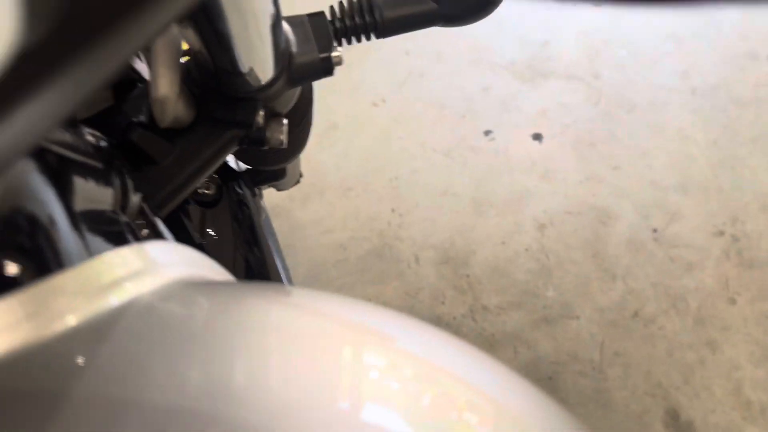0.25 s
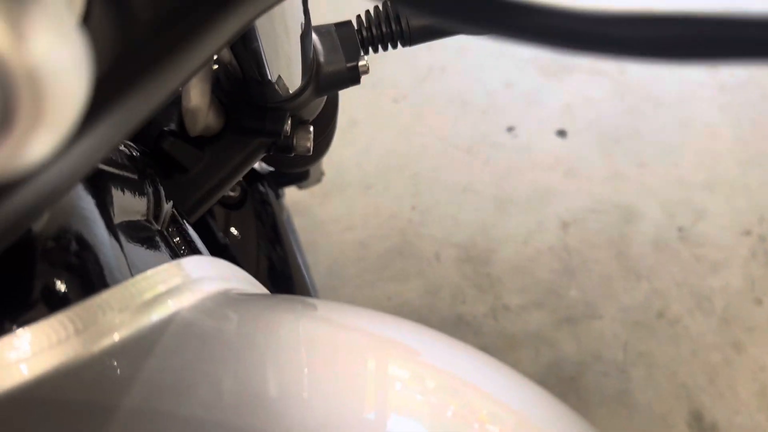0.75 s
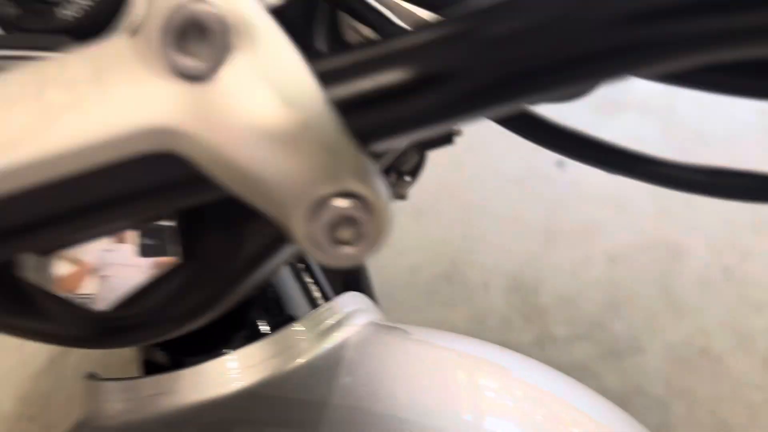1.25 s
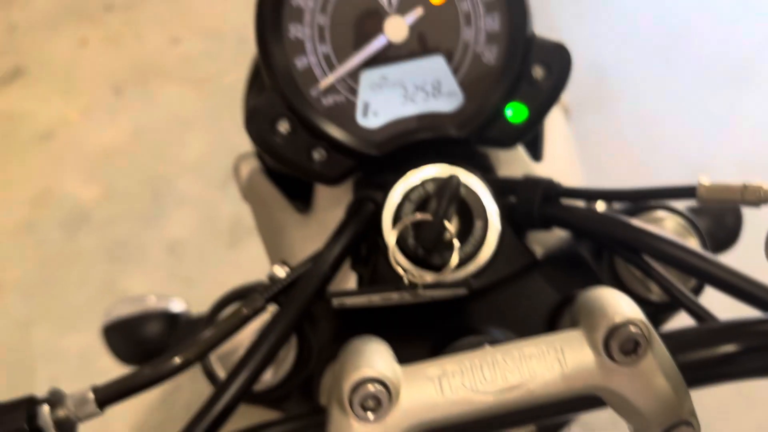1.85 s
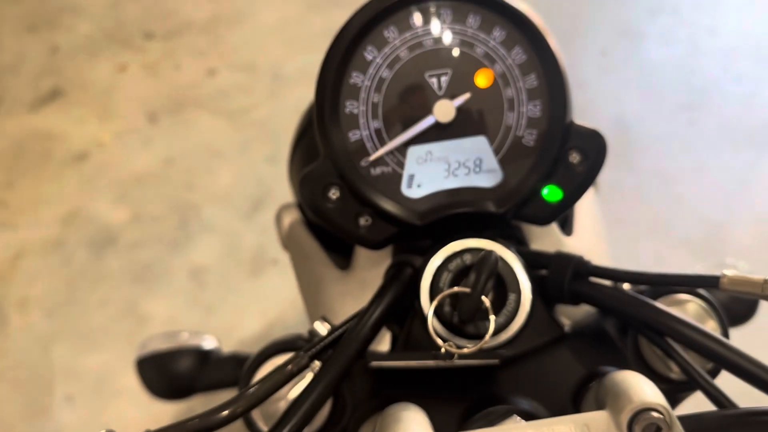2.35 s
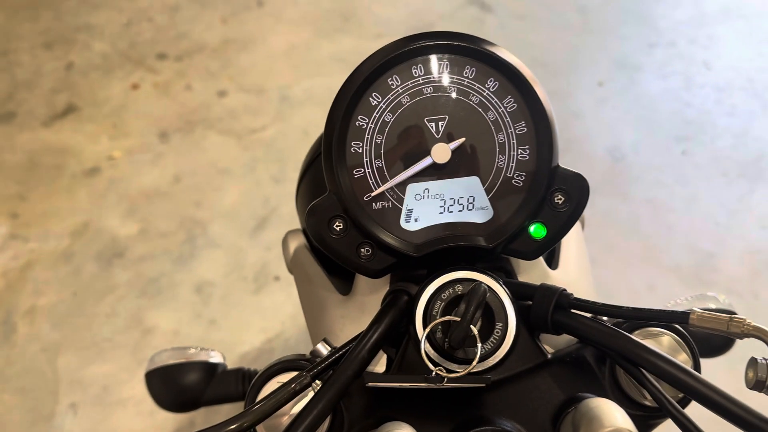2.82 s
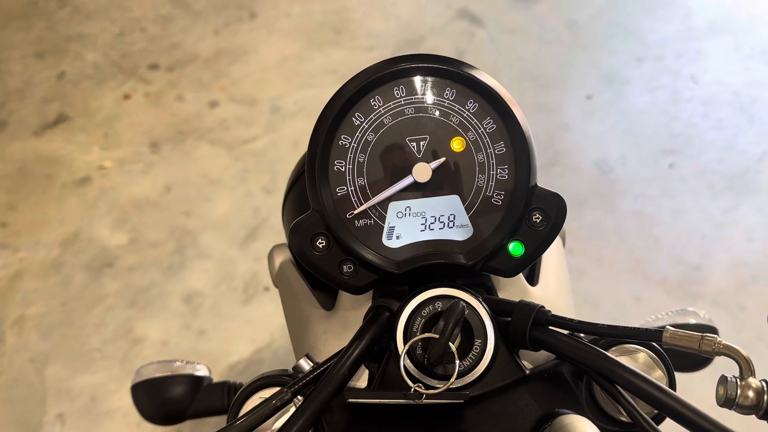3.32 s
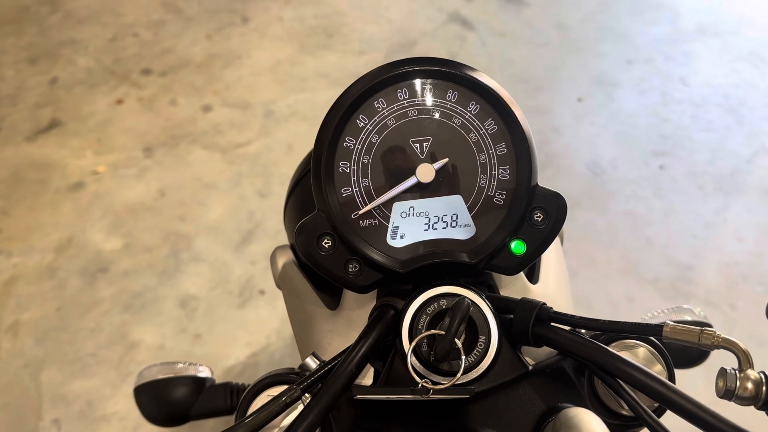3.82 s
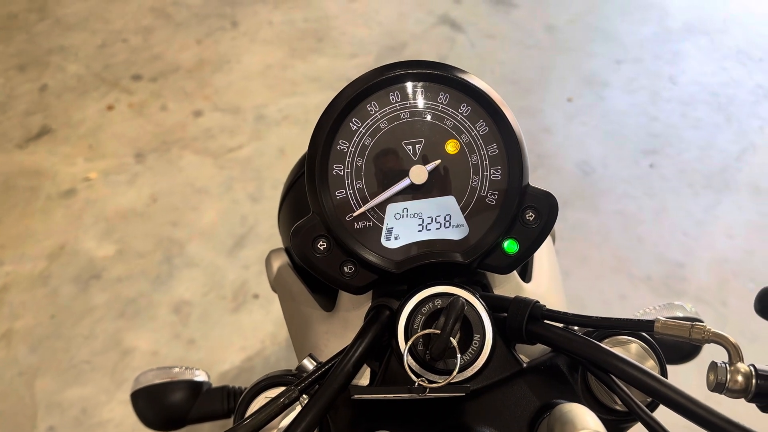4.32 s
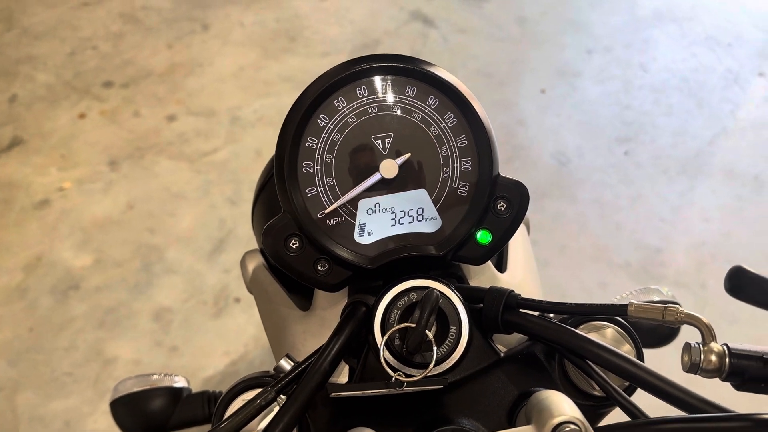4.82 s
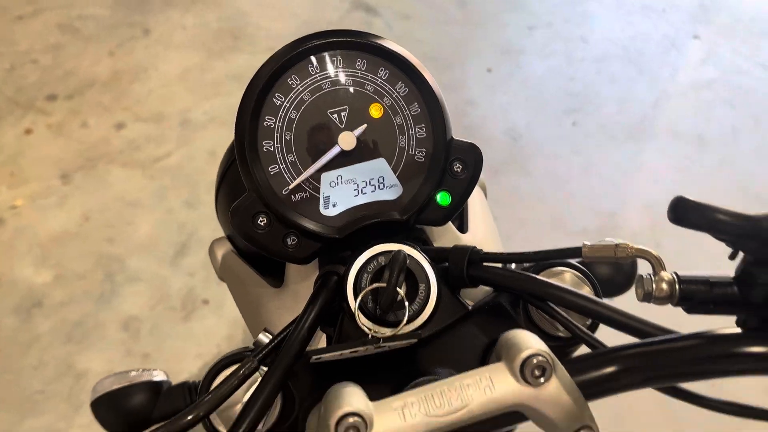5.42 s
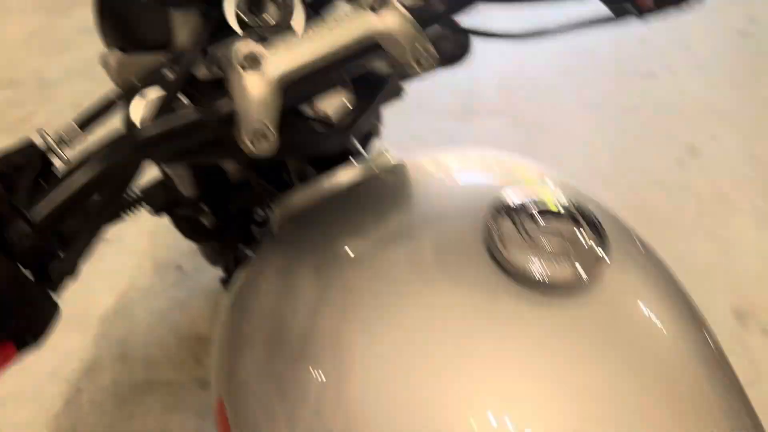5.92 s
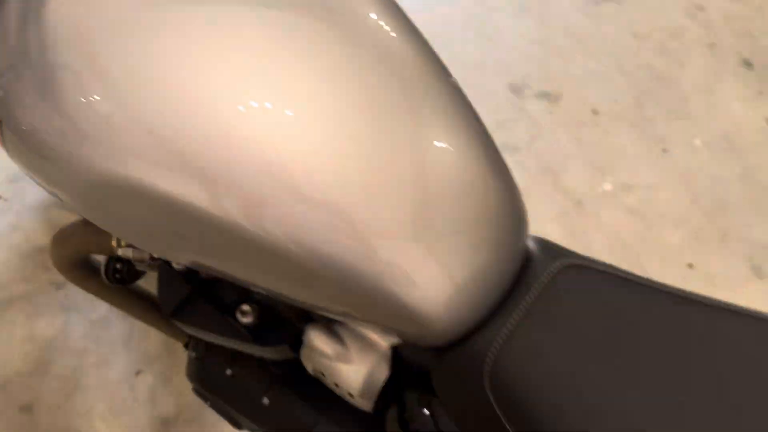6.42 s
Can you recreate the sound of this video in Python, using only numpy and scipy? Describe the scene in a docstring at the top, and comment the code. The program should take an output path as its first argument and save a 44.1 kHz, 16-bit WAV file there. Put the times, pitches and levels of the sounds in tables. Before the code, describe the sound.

An electric starter cranks a two-cylinder motorcycle engine with a few quick, grinding, squealing strokes. In under a second the engine catches with a burst of uneven firings, then settles into a deep, throbbing idle that continues to the end. A gear whine and light valve and chain clatter ride over the exhaust. The microphone is close, above the fuel tank, in a hard-floored room with a short echo.

```python
"""Hard-floored hall: a starter motor cranks a two-cylinder motorcycle engine; it catches and idles.
The starter gears sing, grind and squeal against each compression stroke.
Two unevenly spaced firings per cycle ring the exhaust and the hall; gears whine with engine speed
over valve and chain clatter. A hand-held pair of microphones is above the tank."""
import sys
import numpy as np
from scipy import signal
from scipy.fft import rfft, irfft
from scipy.io import wavfile
from scipy.ndimage import uniform_filter1d

SR = 44100
rng = np.random.default_rng(int(sys.argv[2]) if len(sys.argv) > 2 else 0)


def store_wav(level_fs):
    """Save 16-bit WAV to argv[1]."""
    pcm = np.round(np.clip(np.atleast_2d(level_fs), -1, 1) * 32767)
    wavfile.write(sys.argv[1], SR, pcm.T.astype(np.int16))


N = 293706
TIME_S, BIN_HZ = np.arange(N) / SR, np.fft.rfftfreq(N, 1 / SR)
SETTLED_S = .9  # steady firing begins


def gain(db):
    return 10 ** (np.asarray(db) / 20)


def unit_rms(x):
    return x / np.sqrt(np.mean(x ** 2) + 1e-20)


def per_bin(curve):
    """(Hz, value) curve at each FFT bin, interpolated in log frequency."""
    hz, value = np.transpose(curve)
    return np.interp(np.log(BIN_HZ + 1), np.log(hz + 1), value)


def per_sample(curve):
    """Value columns of a (s, values...) curve at each sample."""
    times_s, *columns = np.transpose(curve)
    return [np.interp(TIME_S, times_s, column) for column in columns]


def noise_pair():
    return rng.standard_normal((2, N))


def shaped_noise(spectrum):
    """Two independent noises with the given spectral shape, unit RMS."""
    return unit_rms(irfft(rfft(noise_pair()) * gain(per_bin(spectrum)), N))


def resonate(x, hz, width_hz):
    """One resonance, fixed or gliding: a click rings as a dying sine."""
    carrier = np.exp(2j * np.pi * np.cumsum(hz * np.ones(N)) / SR)
    pole = np.exp(-np.pi * width_hz / SR)
    return (carrier * signal.lfilter([1], [1, -pole], x * carrier.conj())).imag


def ring(x, modes):
    """Bank of resonances driven by x, unit RMS."""
    return unit_rms(sum(np.sign(polarity) * gain(db) * resonate(x, hz, width_hz)
                        for hz, width_hz, db, polarity in modes))


def engine_speed():
    """Four-stroke cycle rate and running cycle count; the idle hunts slowly."""
    # idle speed: (time [s], cycle rate [Hz])
    idle_speed = [(.9, 12.643), (1.4, 11.957), (2.1, 12.926), (2.4, 12.868), (2.65, 12.498), (2.95, 12.724),
                  (3.25, 12.606), (3.7, 13.039), (4.05, 12.78), (4.45, 12.807), (5.05, 13.242),
                  (5.55, 12.693), (5.85, 12.537), (6.25, 12.215), (6.7, 12.369)]
    cycle_hz = per_sample(idle_speed)[0]
    cycles = np.cumsum(cycle_hz) / SR
    return cycle_hz, cycles - cycles[round(SETTLED_S * SR)] + .425  # phase at SETTLED_S


def hall(x, t60_s=.5, gap_s=.008):
    """Reverberation: one decaying noise tail per channel."""
    t = np.arange(SR // 2) / SR
    tails = rng.standard_normal((2, len(t))) * gain(-60 * t / t60_s) * (t > gap_s)
    return signal.fftconvolve(x, tails / np.linalg.norm(tails[0]), axes=1)[:, :N]


def running_gear(whine_db=-29, clatter_db=-34.5, sag_db_per_s=.38, ease_s=.6, ticks_per_s=300):
    """Throbbing gear whines, ringing covers, valve and chain clatter; louder just after the catch."""
    # gear whines: (cycle rate multiple, width [Hz], relative level [dB], throbs per cycle, depth [0-1])
    gear_orders = [(99.26, 37.3, -1, 4, 0.38), (103.93, 30, -8.5, 4, 0.55), (91.5, 65, -14.5, 4, 0.54),
                   (305.8, 157, -10.5, 3, 0.05), (289.3, 210, -18, 3, 0.04), (395, 260, -23.5, 2, 0.16),
                   (506.4, 200, -23, 2, 0)]
    # cover resonances: (frequency [Hz], width [Hz], relative level [dB], start [s], end [s])
    cover_modes = [(1254, 10, -8, .8, 7), (1350, 10, -10, 4.6, 5.3), (4027, 4, -18, 3.3, 5.45),
                   (5920, 20, -27, 1, 7), (785, 25, -17, 1.8, 5.4), (1090, 40, -15, 1.8, 5.6),
                   (2650, 120, -17, 1, 7), (1980, 30, -14, .75, 1.5)]
    # valve and chain noise: (frequency [Hz], relative density [dB])
    clatter_spectrum = [(140, -19), (240, -7.5), (330, -16), (520, -18), (900, -16), (1200, -11.5),
                        (1560, -14.5), (2100, -19), (2700, -23), (3190, -25), (4430, -29), (6400, -33.5),
                        (7500, -24.5), (8420, -37), (9000, -31), (10200, -33.5), (12500, -48),
                        (15400, -47.5)]
    t = TIME_S
    cycle_hz, cycles = engine_speed()
    whine = 0
    for order, width_hz, db, throbs, depth in gear_orders:
        hz = order * cycle_hz
        band = resonate(resonate(noise_pair(), hz, width_hz), hz, width_hz)
        throb = 1 + depth * np.cos(2 * np.pi * round(throbs) * (cycles - .1))
        whine += gain(db) * unit_rms(band) * throb
    for hz, width_hz, db, start_s, end_s in cover_modes:
        fade = np.clip(np.minimum(t - start_s, end_s - t) / .19, 0, 1)
        whine += gain(db) * fade * unit_rms(resonate(noise_pair(), hz, width_hz))
    ticks = gain(.83 * rng.exponential(1, N)) * (rng.random(N) < ticks_per_s / SR)
    ticks = uniform_filter1d(ticks, size=300)
    clatter = shaped_noise(clatter_spectrum) * (1 + .1 * ticks / ticks.std())
    started = np.clip((t - .68) / .045, 0, 1)
    cold = np.exp(-np.maximum(t - SETTLED_S, 0) / ease_s)
    whine *= gain(whine_db - sag_db_per_s * t + 4.5 * cold) * np.interp(t, (.8, .95), (.3, 1))
    return started * (whine + gain(clatter_db + 8.5 * cold) * clatter)


def squeal(start_s, first_hz, last_hz, db, rise_s=.006, glide_s=.02, t60_s=.29):
    """A starter gear bite squeals or rings the casing: an unsteady tone swells, slides to its last pitch and
    dies."""
    t = np.maximum(np.arange(SR + SR // 4) / SR - start_s, 0)
    hz = last_hz + (first_hz - last_hz) * np.exp(-t / glide_s)
    hz *= 1 + .2 * uniform_filter1d(rng.standard_normal(len(t)), size=200)
    envelope = gain(db - 60 * t / t60_s) * (1 - np.exp(-t / rise_s))
    return np.pad(envelope * np.sin(2 * np.pi * np.cumsum(hz) / SR), (0, N - len(t)))


def starter_strokes(edge_db=-13.5, drag_db=-5.5, drag_db_per_s=37, release_s=.76, release_db_per_s=110):
    """Gear pitch, tone gain, grind gain: strokes swell and glide; grinding drags until pinion release."""
    # strokes against compression:
    # (peak [s], half length [s], first [Hz], last [Hz], relative tone [dB], grinding [dB])
    loads = [(0.036, .1, 700, 745, -21, -27.5), (.148, .016, 1200, 1263, -16, -22.5),
             (.187, 0.0219, 1264, 1300, -17.5, -22.5), (0.317, .045, 1520, 880, -13.5, -21.5),
             (.442, 0.01606, 1400, 983.5, -11, -20.5), (0.643, 0.034, 1600, 945, -15.5, -22)]
    peak_s, half_s, first_hz, last_hz, tone_db, grind_db = np.transpose(loads)[:, :, None]
    edges_s = np.sort(np.c_[peak_s - half_s, peak_s + half_s].ravel())
    hz = np.interp(TIME_S, edges_s, np.c_[first_hz, last_hz].ravel())
    offset_s = TIME_S - peak_s
    swell = gain(edge_db * abs(offset_s) / half_s)
    drag = gain(drag_db - drag_db_per_s * abs(offset_s)) * np.clip(1 + offset_s / half_s, 0, 1)
    engaged = gain(-release_db_per_s * np.maximum(TIME_S - release_s, 0))
    return hz, (gain(tone_db) * swell).max(0), engaged * (gain(grind_db) * (swell + drag)).max(0)


def starter():
    """Gear tooth tone, squeals and grinding that rings the casing; a whistle as it spins free."""
    # tooth tone: (harmonic, relative level [dB])
    harmonics = [(1, -2), (2, -8.5), (3, -19), (4, -24)]
    # casing resonances: (frequency [Hz], width [Hz], relative level [dB])
    casing_modes = [(1200, 170, -8.5), (1403, 26, -5), (2526, 150, -4.5), (4650, 75, -25), (5300, 78, -26),
                    (5750, 32, -17), (6520, 57, -11), (7190, 30, -10), (7530, 88, -11.5),
                    (9230, 110, -16.5), (9660, 58, -18), (11400, 100, -39)]
    # grinding noise: (frequency [Hz], relative density [dB])
    grind_spectrum = [(120, -52), (200, -30.5), (907, -6), (1190, -1.5), (4750, -21), (6600, -19),
                      (8360, -13.5), (9330, -27), (13900, -44), (15500, -43)]
    # free-spin whistle: (time [s], frequency [Hz], level [dB])
    free_spin = [(.74, 13600, -70), (.8, 14400, -53), (.9, 14800, -47), (1, 15500, -44),
                 (1.078, 15500, -70)]
    # gear squeals, and casing rings struck by the bites (the rows of nearly fixed pitch): (start [s], first
    # [Hz], last [Hz], level [dB])
    bites = [(.005, 2900, 1700, -30), (.007, 2300, 1500, -26.5), (.03, 2270, 2260, -27),
             (.133, 2550, 2540, -21), (.135, 6420, 6400, -24.5), (.14, 5150, 5120, -33),
             (.17, 6400, 6380, -26.5), (.17, 5150, 5080, -30), (.18, 1600, 1203, -22.5),
             (.26, 4360, 4330, -31), (.269, 5890, 5870, -20.5), (.295, 2900, 2610, -22.5),
             (.29, 7000, 7080, -34), (.31, 1900, 1050, -33), (.43, 3200, 2600, -35),
             (.615, 6200, 6500, -25), (.62, 2200, 1050, -25), (.622, 3100, 2556, -24),
             (.625, 4350, 4280, -32), (.63, 7150, 7070, -33)]
    tooth_hz, tone_gain, grind_gain = starter_strokes()
    jitter = 1 + .26 * uniform_filter1d(rng.standard_normal(N), size=150)
    teeth = np.cumsum(tooth_hz * jitter) / SR
    tone = sum(gain(db) * np.sin(2 * np.pi * round(k) * teeth) for k, db in harmonics)
    grit = grind_gain * noise_pair()
    casing = sum(gain(db) * np.sqrt(width_hz / 3000) * resonate(grit, hz, width_hz)
                 for hz, width_hz, db in casing_modes)
    whistle_hz, whistle_db = per_sample([(0, 13000, -120)] + free_spin + [(1.2, 15650, -120)])
    whistle = gain(whistle_db) * np.sin(2 * np.pi * np.cumsum(whistle_hz) / SR)
    tonal = gain(-4) * tone_gain * tone + whistle + sum(squeal(*bite) for bite in bites)
    grinding = gain(-7) * casing + grind_gain * shaped_noise(grind_spectrum)
    return np.array([tonal, gain(6) * tonal]) + grinding


def cylinder_pulses(second_phase=.625, second_db=-1, lead_s=.006, scatter_s=.00015, scatter_db=.7):
    """One click per puff or firing, over turbulent flow; idle firings scatter in time and strength."""
    # unfired compression puffs while cranking: (time [s], level [dB])
    puffs = [(.172, -15), (.225, -14.5), (0.288, -20), (.41, -13), (0.523, -13.5), (.57, -15.5),
             (0.653, -15.5)]
    # first uneven firings: (time [s], level [dB])
    catch_firings = [(0.698, -2), (.713, 5), (.745, 0.5), (0.758, -4.5), (0.788, 2), (.814, 0),
                     (0.827, -6.5), (.848, 0.5), (.881, -4), (.912, 5.5), (0.931, -6.5)]
    _, cycles = engine_speed()
    whole = np.arange(1, int(cycles[-1]) + 1)
    timing, strength = rng.standard_normal((len(whole), 2, 2)).T
    crest_s = np.interp([whole, whole + second_phase], cycles, TIME_S, right=7)  # 7 s: past the end
    idle_s = crest_s + scatter_s * timing - lead_s
    idle_db = scatter_db * strength + [[0], [second_db]]
    pulse_s, pulse_db = np.r_[np.c_[idle_s.ravel(), idle_db.ravel()], catch_firings, puffs].T
    clicks = np.zeros(N + SR)
    clicks[(pulse_s * SR).astype(int)] = gain(pulse_db)
    flow = gain(-54) * rng.standard_normal(N) * (TIME_S > .7)
    return clicks[:N] + flow


def exhaust(catch_blend_s=(.685, .723), idle_blend_s=(.87, 1.16), muffler_hz=(47.7, 224.6)):
    """Cylinder pulses ring the exhaust and hall; muffled mode groups swell or sink with speed."""
    # exhaust and hall modes, a list per group: (frequency [Hz], width [Hz], relative level [dB], sign)
    mode_groups = [
        [(64.6, 7.5, 0, 1)],
        [(88.5, 4.2, 2, 0.34), (99.5, 7, 5, 1), (196.1, 5.1, -4, 1)],
        [(111.8, 6.2, -3, 1), (120.25, 5.2, 3, -1), (133, 47, 3.5, 1)],
        [(127.23, 6.7, -4.5, 1), (131.3, 5.7, 1, 1)],
        [(162, 6.2, -8, 1), (177.45, 6.35, 2, 1), (183.76, 5.1, -1.5, -1), (217, 65, -13, -1)],
    ]
    # level per group: (cranking [dB], catching [dB], idling at each of speeds_hz [dB])
    group_levels = [(-15, -30, [-43, -35.5, -28, -29, -22, -21.5]),
                    (-13.5, -15.5, [-17.5, -27.5, -27.5, -21.5, -23, -19.5]),
                    (-39, -23.5, [-18, -17, -19.5, -33, -39, -36]),
                    (-27, -22, [-20, -17.5, -21, -18, -15.5, -17.5]),
                    (-37, -17, [-13.5, -18.5, -18.5, -20.5, -26.5, -23.5])]
    # idle speed grid: (cycle rate [Hz])
    speeds_hz = [12, 12.3, 12.6, 12.8, 13, 13.25]
    # modes independent of speed: (frequency [Hz], width [Hz], relative level [dB], sign)
    steady_modes = [(39.86, 3.1, -3, -1), (317, 13.3, -10, 1), (341.4, 10, -7, -1)]
    cycle_hz, _ = engine_speed()
    pulses = cylinder_pulses()
    idling = np.interp(TIME_S, idle_blend_s, (0, 1))
    boom = 0
    for (crank_db, catch_db, speed_db), modes in zip(group_levels, mode_groups):
        start_db = np.interp(TIME_S, catch_blend_s, (crank_db, catch_db))
        idle_db = np.interp(cycle_hz, speeds_hz, speed_db)
        boom += gain((1 - idling) * start_db + idling * idle_db) * ring(pulses, modes)
    muffler = signal.butter(4, muffler_hz, "band", fs=SR, output="sos")
    return signal.sosfilt(muffler, boom) + gain(-32) * ring(pulses, steady_modes)


def microphone_pair(common, other):
    """Left hears common; right hears a phase-shifted share of it and a share of other."""
    # share of common in the right: (frequency [Hz], share [0-1])
    likeness = [(60, 0.97), (130, 0.95), (290, 0.95), (640, 0.48), (1410, 0.36), (3100, 0.53), (6820, 0.79),
                (15000, 1)]
    # phase lead of the left: (frequency [Hz], lead [rad])
    lead = [(0, 0), (700, 0), (1290, -.9), (1810, -.3), (2500, .8), (3880, 1.1), (5940, .6), (7750, 2.5),
            (8440, 3.1), (9130, 1.8), (10400, .5), (14300, .9)]
    # balance: (frequency [Hz], left minus right [dB])
    balance = [(60, 2.5), (110, 3), (200, -1.5), (380, 1), (700, 1.5), (1290, -1.5), (2380, 1), (4400, 5),
               (8120, 2.5), (15000, -2)]
    share = np.clip(per_bin(likeness), 0, 1)
    left = rfft(common)
    right = share * left * np.exp(-1j * per_bin(lead)) + np.sqrt(1 - share ** 2) * rfft(other)
    half_db = per_bin(balance) / 2
    return irfft([left * gain(half_db), right * gain(-half_db)], N)


def scene():
    """Starter with its reverberation, running gear and exhaust at the two microphones."""
    boom, crank = exhaust(), starter()
    boom_pair = np.array([boom, np.roll(boom, 85)])  # second channel 1.9 ms late
    mix = crank + gain(-5.5) * hall(crank) + running_gear() + boom_pair
    return microphone_pair(*mix)


def record(dry, bass_cut_hz=30, ceiling_db=-.5, band_limit_hz=15690):
    """Microphone bass roll-off, gentle overload on the loudest firings, band limit."""
    cut = signal.sosfilt(signal.butter(4, bass_cut_hz, "high", fs=SR, output="sos"), dry)
    saturated = gain(ceiling_db) * np.tanh(cut / gain(ceiling_db))
    lowpass = signal.firwin(511, band_limit_hz, window=("kaiser", 9), fs=SR)
    return signal.oaconvolve(saturated, lowpass[None], "same")


dry = scene()
out = record(dry)
store_wav(out)
```